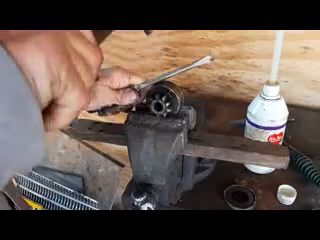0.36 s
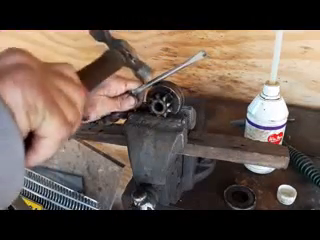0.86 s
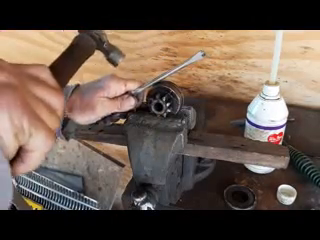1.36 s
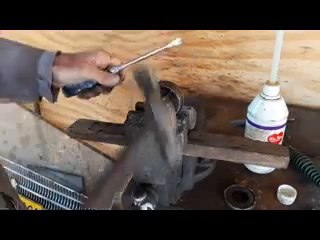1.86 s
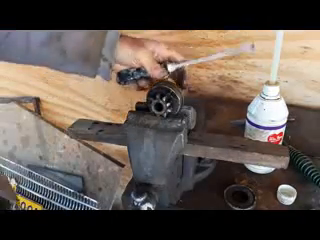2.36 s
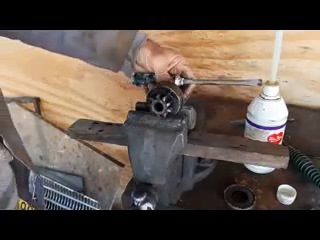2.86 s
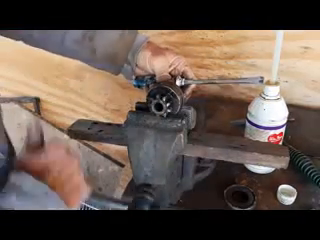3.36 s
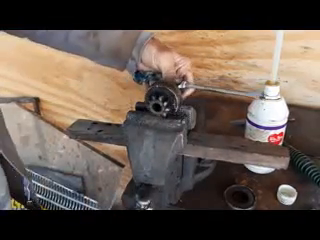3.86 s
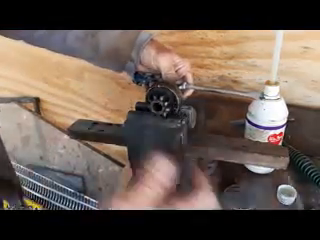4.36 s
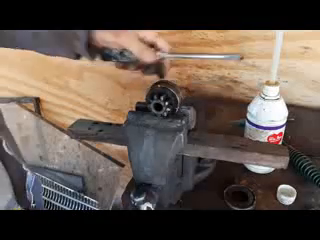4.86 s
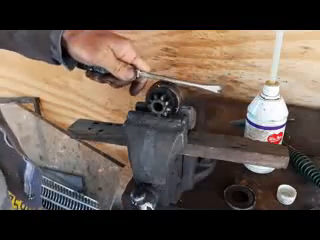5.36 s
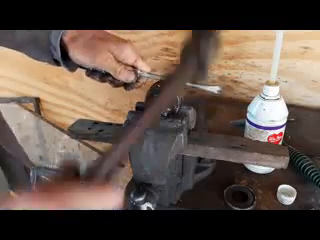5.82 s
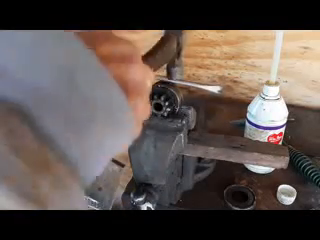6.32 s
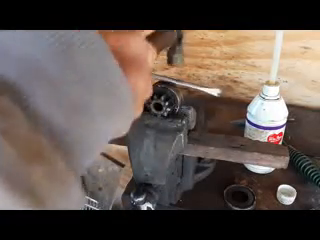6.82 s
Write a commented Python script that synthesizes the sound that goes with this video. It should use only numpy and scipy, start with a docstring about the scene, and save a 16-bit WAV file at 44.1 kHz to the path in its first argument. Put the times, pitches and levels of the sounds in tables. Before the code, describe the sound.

Close up at a wooden workbench, a hammer taps a tool against a part in a vise: three spaced cracks with rattling rebounds and a very high thin ring. Then tools are set down with heavy knocks, shuffled and briefly dragged amid rustling cloth. After quieter handling, one hit and two bright clanks close it. Near stereo microphone, small dry shop.

```python
"""A hammer taps a screwdriver set against a part in a vise on a wooden bench; the hammer head rings thin and high.
Between the taps tools are put down, dragged and picked up, over faint shop air and rustling sleeves.
Shaped noise makes cracks, clatter, thuds and air; dying tones make the ringing steel and wood.
Random catches of a dragged tool set its steel ringing. A stereo microphone stands close."""
import sys
import numpy as np
from scipy import signal
from scipy.fft import rfft, irfft
from scipy.io import wavfile
from scipy.ndimage import uniform_filter1d

SR = 44100
rng = np.random.default_rng(int(sys.argv[2]) if len(sys.argv) > 2 else 0)


def decibels_to_gain(level_db):
    """Convert a level in decibels to a linear amplitude gain (20 dB per decade)."""
    exponent = np.asarray(level_db, float) / 20
    return 10 ** exponent


def master(y):
    """Save y as 16-bit WAV."""
    cut = np.clip(np.atleast_2d(y).T, -1, 1)
    pcm = np.round(cut * 32767)  # scale
    wavfile.write(sys.argv[1], SR, pcm.astype(np.int16))


N = 317520  # length in samples

# Tones of the wooden bench. Each row: pitch in Hz, relative level in dB,
# time to fade by 60 dB in seconds, before the user's own stretch.
BENCH_TONES = [(103.5, -3.5, 0.81), (166.4, -4, 0.45), (203.3, -12, 0.23), (290, -4, 0.54),
               (321.4, -9, 0.39), (397, -6.5, 0.056), (459.5, -5.5, 0.55), (533, -1.5, 0.066)]


def evened(x):
    """Scales to an rms (average strength) of 1."""
    return x / np.sqrt(np.mean(x ** 2) + 1e-20)


def read(points, hz):
    """Reads a table between its points, on a log-frequency axis."""
    f, value = np.transpose(points)
    return np.interp(np.log(hz + 1), np.log(f + 1), value)


def add(mix, s, sound, place):
    """Mixes a stereo sound in; the side of the microphone farther from it hears it a little later."""
    for port, sign in enumerate((1, -1)):
        first = round(s * SR + sign * place * 5.5)  # shifts each side by up to 5.5 samples
        part = mix[port, first:][:sound.shape[-1]]
        part += sound[port, :len(part)]


def wander(n, count):
    """Slow random drift of rms 1 for each side, smoothed twice over count samples."""
    drift = uniform_filter1d(rng.standard_normal((2, n)), size=count)
    return evened(uniform_filter1d(drift, size=count))


def noise(seconds, db, size, patchy_db):
    """Stereo noise whose short-time spectrum follows db(hz, t), with narrow patches that come and go."""
    # How alike left and right are. Each row: frequency in Hz, likeness (1 is the same).
    likeness = [(60, 0.91), (300, 0.99), (1000, 0.48), (4000, 0.23), (12000, 0.09)]
    frames = int(seconds * SR * 4 / size) + 6
    hz = np.fft.rfftfreq(size, 1 / SR)[:, None]
    a, b, c, d, patches = rng.standard_normal((frames, size // 2 + 1, 5)).T
    patches = uniform_filter1d(uniform_filter1d(patches, size=2, axis=0), size=16, axis=1)
    patches = evened(patches)
    same = np.clip(read(likeness, hz), -1, 1)
    left = a + 1j * b
    right = same * left + np.sqrt(1 - same ** 2) * (c + 1j * d)
    start = np.sqrt(np.mean(decibels_to_gain(db(hz, 0)) ** 2) * size)  # evens out the strength of the opening
    shape = decibels_to_gain(db(hz, np.arange(frames) * size / 4 / SR) + patchy_db * patches) / start
    z = np.array([left, right]) * shape
    return signal.istft(z, nperseg=size, noverlap=size - size // 4)[1][:, :int(seconds * SR)]


def modes(table, stretch, spread_db):
    """Dying tones; every blow lands elsewhere, so their strengths vary, and each side hears another phase."""
    hz, db, t60 = np.transpose(table)[:, :, None]
    t = np.arange(int(.8 * SR)) / SR
    chance, turn, skew = rng.random((3, len(hz), 1))
    fade = decibels_to_gain(db + spread_db * (chance - 1.5) - 60 * t / (t60 * stretch))
    fade = fade * np.minimum(t * hz / 0.5, 1)  # each tone rises over half a cycle
    ports = [(fade * np.sin(2 * np.pi * (hz * t + turn + lead * skew))).sum(0) for lead in (0, .22)]
    return np.array(ports) / np.sqrt((decibels_to_gain(db) ** 2).sum() / 2)


def air():
    """Low wash of the shop and rustle of sleeves, both shaped noise; faint long tones and far chirps are sines."""
    # Levels over time. Each row: time in seconds, low wash in dB, rustle in dB.
    air_levels = [(0, -78, -85.5), (1.2, -79, -85.5), (1.752, -73, -79.5), (2.2, -68.5, -75.5),
                  (2.898, -62.5, -84), (3.098, -50, -59), (3.501, -51, -66.5), (3.901, -62, -79.5),
                  (4.4, -53, -60), (4.75, -62.5, -75), (5.2, -55, -70.5), (5.302, -54.5, -54.5),
                  (5.7, -55, -58), (5.95, -62.5, -76.5), (6.6, -57.5, -76), (7.2, -59, -87)]
    # Colour of the wash. Each row: frequency in Hz, relative level in dB.
    wash_colour = [(18, -78), (30, -41.5), (53, 0), (134, -8), (161, -13.5), (438, -3.5), (1590, -16),
                   (2210, -30.5), (2600, -27.5), (4000, -49), (5200, -68.5), (8800, -120)]
    # Colour of the rustle. Each row: frequency in Hz, relative level in dB.
    rustle_colour = [(600, -20), (1500, 0), (4000, -6), (12800, -12), (13600, -50)]
    # Faint long tones set off by blows. Each row: start in seconds, level in dB, pitch in Hz.
    hums = [(.091, -69.5, 1136), (.734, -64, 1098)]
    # Far chirps. Each row: start in seconds, level in dB, starting pitch in Hz.
    chirps = [(2.189, -66, 2580), (2.214, -65, 2500), (3.859, -74.5, 2580), (3.924, -62, 2560)]
    hum_t60_s = 4  # time to fade by 60 dB
    t = np.arange(N) / SR
    s, wash_db, rustle_db = np.transpose(air_levels)
    wash = noise(N / SR + .1, lambda hz, u: read(wash_colour, hz) + 0 * u, size=2048, patchy_db=3.0)[:, :N]
    rustle = noise(N / SR + .1, lambda hz, u: read(rustle_colour, hz) + 0 * u, size=256, patchy_db=7.0)[:, :N]
    out = evened(wash) * decibels_to_gain(np.interp(t, s, wash_db))
    out += evened(rustle) * decibels_to_gain(np.interp(t, s, rustle_db))
    for at, db, hz in hums:
        u = t[:int(1.6 * SR)]
        fade = decibels_to_gain(db - 60 * u / hum_t60_s + 1.5 * wander(len(u), count=3000))
        fade = fade * np.minimum((u[-1] - u) / .3, 1)
        add(out, at, fade * np.sin(2 * np.pi * hz * u), 0)
    for at, db, hz in chirps:
        u = t[:int(.03 * SR)]
        chirp = decibels_to_gain(db) * np.sin(2 * np.pi * hz * u * (1 + .5 * u)) * np.hanning(len(u))  # glides up slightly
        add(out, at, chirp * np.ones((2, 1)), .3)
    return out


def steel(touches, scale=1):
    """Touches ring the tones of a steel tool; a smaller piece rings higher."""
    # Tones of the tool. Each row: pitch in Hz before scale, width in Hz (wider dies sooner), relative level in dB.
    tool_tones = [(1470, 120, -2), (2630, 70, -1), (3040, 70, 1), (3410, 70, 2), (3780, 70, 4),
                  (4350, 80, -4), (5170, 90, -3), (5600, 80, -4), (6260, 110, 5), (7090, 90, -4),
                  (7750, 90, -2), (8320, 70, -1), (9480, 120, -4), (10600, 120, -10)]
    u = np.arange(2048) / SR
    tool = sum(decibels_to_gain(db) * np.sqrt(w) * np.exp(-np.pi * w * u) * np.sin(2 * np.pi * f * scale * u)
               for f, w, db in tool_tones)
    return evened(signal.fftconvolve(touches, tool)[:len(touches)])


def hit(crack_db, clatter_db, bench_db, t60, centre_hz):
    """A few ms of crack, a short ping, the clatter of loose metal dying band by band, and the bench thudding."""
    # Colour of the crack. Each row: frequency in Hz, relative level in dB.
    crack_colour = [(120, -36.5), (200, -42), (616, -10.5), (2910, -11.5), (3800, -12.5), (7770, -8.5),
                    (9280, -18), (12600, -17.5), (14200, -30)]
    # Colour of the clatter. Each row: frequency in Hz, relative level in dB.
    clatter_colour = [(88, -45.5), (150, 7), (454, -14.5), (728, -3.5), (1260, -4), (2120, -10.5),
                      (3290, -8), (6670, -21.5), (7440, -31), (11500, -54), (15000, -41), (22000, -120)]
    # How long each band clatters. Each row: frequency in Hz, factor on t60.
    clatter_fade = [(150, 0.62), (600, 1.52), (2000, 1.207), (5000, 1.07), (8500, 0.83), (10500, 0.28)]
    # Bench and floor shaking. Each row: frequency in Hz, relative level in dB.
    thud_colour = [(18, -52.5), (30, -26.5), (102, -5.5), (238, -7.5), (453, -4), (574, -10.5),
                   (700, -14.5), (910, -36.5), (1540, -120)]
    # The struck piece. Each row: factor on centre_hz, relative level in dB, 60 dB fade in seconds before stretch.
    ping_tones = [(.72, -6, .05), (1, 0, .07), (1.23, -4, .05)]
    rattles_per_s, rattle_db = 110, -11  # loose steel touching while the clatter lasts
    seconds = min(1.3 * t60, .8)
    t = np.arange(int(seconds * SR)) / SR
    colour = lambda hz: -1.2 * np.log2((hz + 20) / centre_hz) ** 2  # strongest near centre_hz

    def clatter_shape(hz, s):
        # the clatter falls slowly at first, then faster
        fall = 60 * (s / (t60 * read(clatter_fade, hz))) ** 1.18
        return read(clatter_colour, hz) + colour(hz) - fall

    clatter = noise(seconds, clatter_shape, size=512, patchy_db=2)
    draw, size = rng.random((2, len(t)))
    touches = (draw < rattles_per_s / SR) * (2 * size - 1)
    rattle = steel(touches, .8 + .4 * size[0])
    rattle = rattle * decibels_to_gain(colour(4000) - 75 * (t / t60) ** 1.4)
    clatter += decibels_to_gain(rattle_db) * rattle
    thud = noise(seconds, lambda hz, s: read(thud_colour, hz) + 0 * s, size=2048, patchy_db=4.5)
    thud = thud * decibels_to_gain(-60 * t / (1.71 * t60))
    # the clatter swells over about 20 ms while the thud rises in 6 ms
    sound = decibels_to_gain(clatter_db) * clatter * np.minimum(.3 + t / .025, 1)
    sound += decibels_to_gain(bench_db - 4) * thud * np.minimum(t / .006, 1)
    crack = noise(.06, lambda hz, s: read(crack_colour, hz) + 1.5 * colour(hz) + 0 * s, size=128, patchy_db=2)
    u = t[:crack.shape[1]]
    sound[:, :len(u)] += decibels_to_gain(crack_db - 60 * (u / .017) ** 2) * crack * np.minimum(u / .0025, 1)
    sound = sound * np.minimum((seconds - t) / .02, 1)
    sound = np.pad(sound, ((0, 0), (0, int(.8 * SR) - len(t))))
    ping = modes([(k * centre_hz, db, fade) for k, db, fade in ping_tones], 0.68, spread_db=9)
    wood = modes(BENCH_TONES, t60 / .42, spread_db=7)
    return sound + decibels_to_gain(crack_db - 6.5) * ping + decibels_to_gain(bench_db - 2.5) * wood


def blow(crack_db, clatter_db, t60, centre_hz):
    """The hit, the steel of screwdriver and vise, a low push of the bench top and the slow hum of the vise mount."""
    # Screwdriver and vise. Each row: pitch in Hz, relative level in dB, 60 dB fade in seconds before stretch.
    vise_tones = [(1170, 1, 0.17), (2270, -24, 0.43), (4450, -9.5, 0.1), (5100, -1, 0.08),
                  (6270, -10, 0.11), (6330, -14, 0.071), (6460, -30.5, 0.68), (8300, -16.5, 0.34),
                  (7500, -4, 0.18), (8530, -19.5, 0.15), (10860, 1, 0.05)]
    # The vise rocking on its bolts. Each row: pitch in Hz, relative level in dB, 60 dB fade in s before stretch.
    mount_tones = [(103, 0, .8), (296, -5, .95)]
    push_hz, push_db, push_s = 65, -4, .018  # the bench top gives once; dB against the bench
    bench_db = clatter_db - 0.5
    t = np.arange(int(.8 * SR)) / SR
    vise = decibels_to_gain(crack_db - 13.5) * modes(vise_tones, 0.8, spread_db=15.5)
    mount = decibels_to_gain(bench_db - 3) * modes(mount_tones, .9, spread_db=4)
    push = decibels_to_gain(bench_db + push_db) * np.sin(2 * np.pi * push_hz * t) * np.exp(-t / push_s)
    return hit(crack_db, clatter_db, bench_db, t60, centre_hz) + vise + mount + push


def ring(seconds, db, pan_db, lead, drift, speed):
    """Two high tones of the hammer head, the upper dying sooner; its swing bends the pitch and drift turns the phases."""
    # Tones of the head. Each row: pitch in Hz, relative level in dB.
    head_tones = [(12222, 10), (12866, -13)]
    rise_s, t60_s, waver_db, swing_s = 0.0083, .75, 2.5, 0.36
    t = np.arange(int(seconds * SR)) / SR
    side = np.array([[.5], [-.5]])  # left, right
    heard = np.cumsum(1 + speed / 343 * np.sin(np.pi * t / swing_s)) / SR  # 343 m/s is the speed of sound
    turn = side * (lead + drift * t)
    tones = sum(decibels_to_gain(top - 25 * k * t) * np.sin(2 * np.pi * hz * heard + turn)
                for k, (hz, top) in enumerate(head_tones))
    edges = np.minimum(np.minimum(t / rise_s, (t[-1] - t) / 0.0013), 1)
    level_db = db + side * pan_db - 60 * t / t60_s + waver_db * wander(len(t), count=900)
    return np.sqrt(2) * tones * edges * decibels_to_gain(level_db)


def walls(x):
    """Sparse early echoes off bench and walls, other ones for each side, kept thin with little below 500 Hz."""
    echo_low_hz = 500
    taps = np.zeros((2, 6000))
    at = np.arange(120, 5960, 40) + rng.integers(0, 40, (2, 146))  # delays in samples
    np.put_along_axis(taps, at, rng.choice([-1., 1.], at.shape), 1)
    taps *= decibels_to_gain(-60 * np.arange(6000) / SR / 0.15)
    x = signal.lfilter(*signal.butter(N=2, Wn=echo_low_hz, btype="high", fs=SR), x)
    return signal.fftconvolve(x, taps / np.linalg.norm(taps[0]), axes=1)[:, :N]


def rebound(crack_db, clatter_db, t60):
    """The struck parts land again: a lighter hit with no ringing of screwdriver and vise after it."""
    return hit(crack_db, clatter_db, bench_db=clatter_db + 3.5, t60=t60, centre_hz=3400)


def knock(clatter_db, *row):
    """A hit with a sharp contact: the crack is set 10 dB above the clatter."""
    return hit(clatter_db + 10, clatter_db, *row)


def shift(clatter_db, *row):
    """A hit with hardly any crack: it is set 16 dB below the clatter."""
    return hit(clatter_db - 16, clatter_db, *row)


def drag(held, pressure_db, release, rumble_db):
    """Uneven catches, coming in clumps, ring the tool, hiss, and rumble in the bench."""
    bite_db, bite_s = 2, .012  # the first catch is stronger
    rumble_rise_s = 0.062
    t = np.arange(int(.3 * SR)) / SR
    draw, size = rng.random(len(t)), rng.exponential(1, len(t))
    slow, sign = rng.standard_normal((2, len(t)))
    clumps = evened(uniform_filter1d(uniform_filter1d(slow, size=250), size=250))
    clumps = decibels_to_gain(3.5 * clumps)
    catches = (draw < 900 / SR) * decibels_to_gain(4 * np.minimum(size, 3)) * np.sign(sign) * clumps  # about 900 a second
    catches = uniform_filter1d(catches, size=3)  # each contact lasts a moment, which dulls the top
    hiss = noise(.4, lambda hz, u: -7.5 * np.log2((hz + 20) / 2800) ** 2 + 0 * u, size=512, patchy_db=4)
    metal = decibels_to_gain(-.5) * steel(catches) + decibels_to_gain(-7) * evened(hiss[:, :len(t)] * clumps)
    u = np.arange(2048) / SR
    wood = sum(decibels_to_gain(db - 60 * u / 0.1) * np.sin(2 * np.pi * f * u) for f, db, _ in BENCH_TONES)
    rumble = evened(signal.fftconvolve(catches, wood)[:len(t)]) * decibels_to_gain(rumble_db)
    rumble = rumble * np.minimum(t / rumble_rise_s, 1) ** 2
    pressure = decibels_to_gain(pressure_db + bite_db * np.exp(-t / bite_s) - release * np.maximum(t - held, 0))
    edges = np.minimum(np.minimum(t / 0.0016, (t[-1] - t) / 0.15), 1)
    return (metal * pressure + rumble) * edges


def scene():
    """All sources at the bench; the head rings in the air above, at most 0.9 s or until a blow or the first knock."""
    # Hammer blows. Each row: start in seconds, crack in dB, clatter in dB, base fade time in seconds,
    # centre in Hz, place from -1 left to 1 right. All levels in these tables are relative.
    blows = [(0.09, -12, -21.5, 0.38, 2390, .8), (0.7337, -8, -25.5, 0.41, 2420, .75),
             (1.4677, -11, -37.5, 0.36, 3040, -.45), (2.3001, -4, -33, 0.34, 5290, -.4),
             (5.486, -5.5, -33, 0.3, 1150, -.45), (6.2618, -9, -21, 0.31, 2550, .45),
             (6.6833, -9, -20, 0.28, 2510, .55)]
    # Ring of the hammer head. Each row: start in seconds, level in dB, left over right in dB,
    # left lead in radians, its drift in radians per second, swing in metres per second.
    rings = [(.092, -34, 2, -1.03, 9.5, -0.03), (0.733, -38.5, 4.5, -2, 12.5, -0.2),
             (1.47, -33.5, 5.5, -2, 3.5, 0.99), (2.3, -39.5, 2.5, 3.86, -18, 0.3),
             (5.486, -39.5, 7, 3.5, 2, 0.1), (6.265, -26.5, 0.5, 1.77, 0.5, .03),
             (6.683, -26.5, -1.5, 3, -8, .12)]
    # The struck parts jump and land again. Each row: start in seconds, crack in dB, clatter in dB,
    # base fade time in seconds.
    rebounds = [(.1701, -19, -25, 0.22), (.2195, -18, -26.5, 0.3), (.2834, -26, -32, .2),
                (.8012, -15, -28, 0.29), (.8416, -21.5, -31.5, 0.38), (.9359, -41.5, -40, 0.21)]
    # Hard things put down on the bench. Each row: start in seconds, clatter in dB, bench in dB,
    # base fade time in seconds, centre in Hz.
    knocks = [(2.5324, -14.5, -10.5, 0.32, 2893), (2.7348, -15, -10, 0.31, 2040),
              (3.2419, -22.5, -51, 0.25, 3680), (3.4469, -36.5, -46, .06, 1700),
              (4.9828, -26, -34.5, 0.14, 5224), (5.0876, -35.5, -41.5, 0.12, 2860),
              (5.326, -36.5, -26, 0.4, 2660)]
    # Things shifted without a sharp contact. Each row: start in seconds, clatter in dB, bench in dB,
    # base fade time in seconds, centre in Hz.
    shifts = [(2.642, -25.5, -12.5, 0.088, 3960), (2.9533, -31.5, -48, 0.15, 4630),
              (2.9739, -27.5, -30, 0.075, 2350), (3.043, -52, -33.5, 0.19, 900),
              (3.1104, -33, -31, 0.11, 1210), (3.365, -26.5, -42.5, 0.062, 2380),
              (4.0335, -35, -46, 0.12, 2500), (4.0558, -40.5, -45, 0.12, 4020),
              (4.1253, -33.5, -50, 0.48, 2360), (4.2952, -30, -40.5, 0.22, 2410),
              (4.4232, -54, -40.5, 0.52, 910), (4.5553, -49.5, -41.5, 0.13, 5080),
              (5.3976, -20.5, -17, 0.13, 580), (5.6034, -37, -50, 0.094, 1970)]
    # A steel tool dragged. Each row: start in seconds, time held in seconds, pressure in dB,
    # release in dB per second, bench rumble in dB.
    drags = [(3.166, .17, -24.5, 303, -47), (4.144, 0.064, -23.5, 208, -41)]
    bench, head = np.zeros((2, 2, N))
    for s, *row, place in blows:
        add(bench, s, blow(*row), place)
    others = (rebounds, rebound, .8), (knocks, knock, -.5), (shifts, shift, -.5), (drags, drag, -.4)
    for table, sound, place in others:
        for s, *row in table:
            add(bench, s, sound(*row), place)
    stops = np.array([row[0] for row in rings + knocks[:1]] + [N / SR + 1])
    for s, *row in rings:
        seconds = min(stops[stops > s].min() - s, .9)
        add(head, s, ring(seconds, *row), 0)
    return bench + decibels_to_gain(-5) * walls(bench) + head + air()


def roll_off(x):
    """The treble ends steeply here."""
    return signal.sosfilt(signal.butter(12, 14400, fs=SR, output="sos"), x)


def record(dry):
    """The two sides of the microphone differ in colour and lose the top treble and lowest bass."""
    # Colour of the two sides. Each row: frequency in Hz, left over right in dB.
    left_over_right = [(30, -2), (80, 4.5), (300, 3.5), (700, 1), (1400, 2), (4000, .2), (9000, 0),
                       (12000, -3)]
    edge_hz, bass_cut_hz = 13300, 40
    hz = np.fft.rfftfreq(N, 1 / SR)
    half = decibels_to_gain(read(left_over_right, hz) / 2)
    sides = np.array([half, 1 / half])
    x = irfft(rfft(dry) * sides / (1 + (hz / edge_hz) ** 40), N)
    x = signal.lfilter(*signal.butter(N=1, Wn=bass_cut_hz, btype="high", fs=SR), x)
    return roll_off(x)


dry = scene()
out = record(dry)
master(out)
```